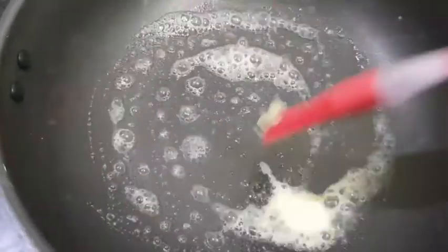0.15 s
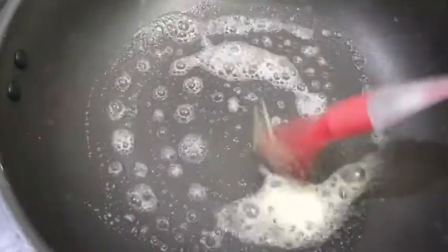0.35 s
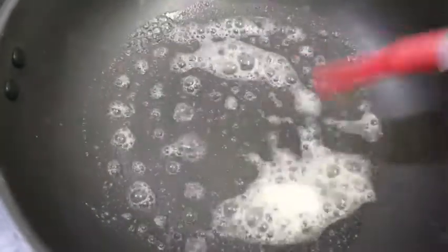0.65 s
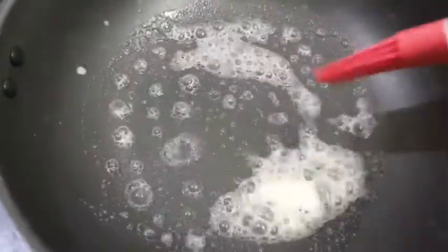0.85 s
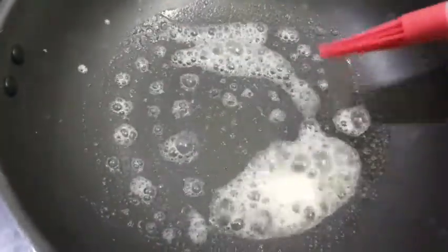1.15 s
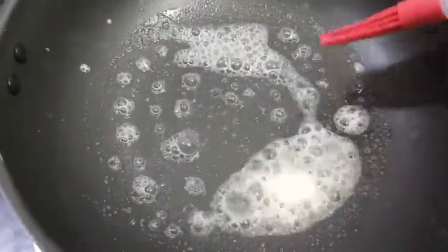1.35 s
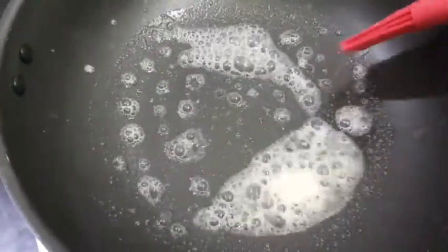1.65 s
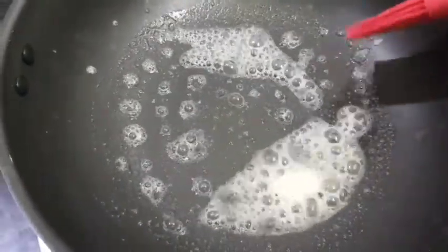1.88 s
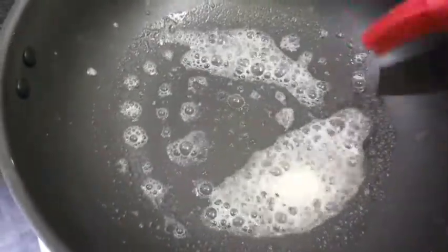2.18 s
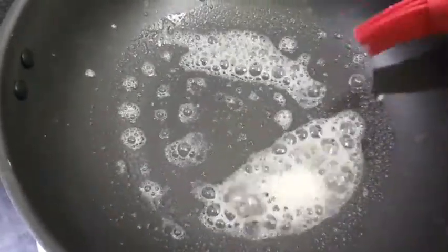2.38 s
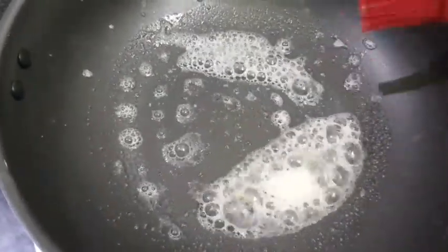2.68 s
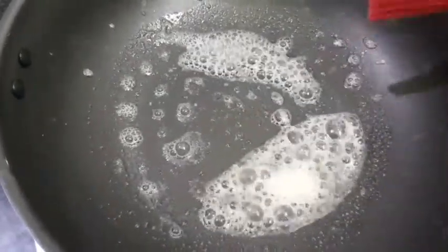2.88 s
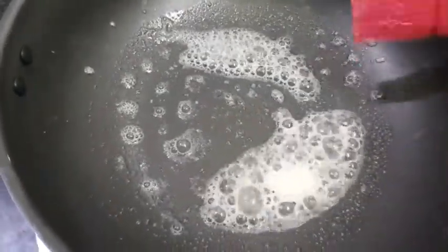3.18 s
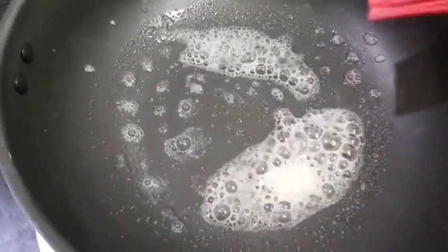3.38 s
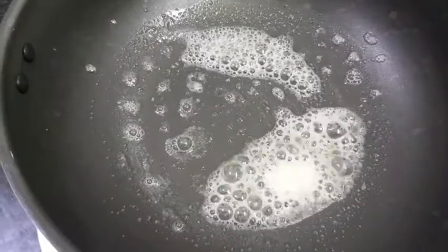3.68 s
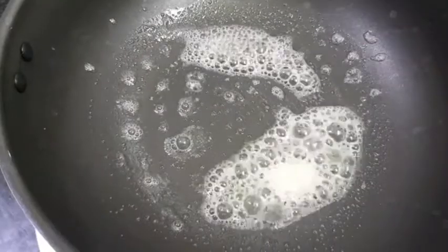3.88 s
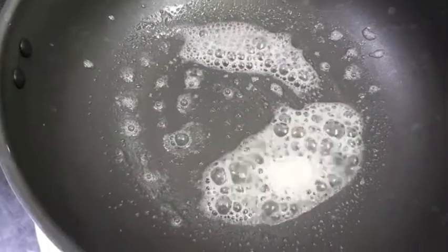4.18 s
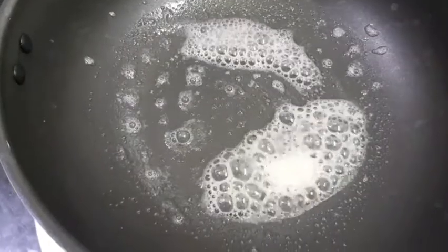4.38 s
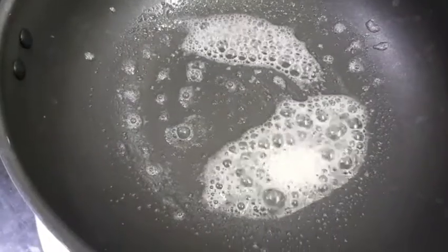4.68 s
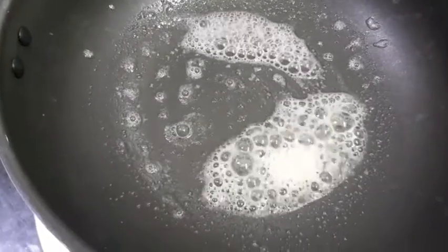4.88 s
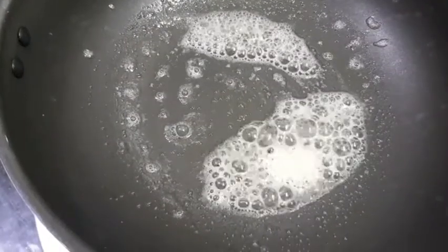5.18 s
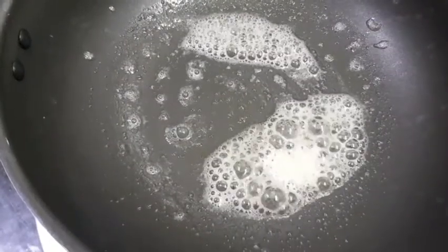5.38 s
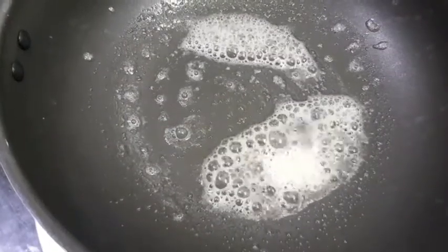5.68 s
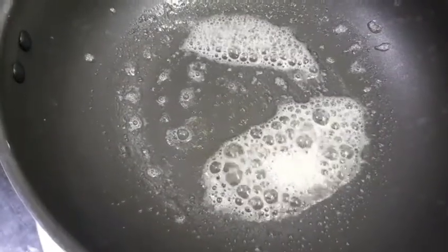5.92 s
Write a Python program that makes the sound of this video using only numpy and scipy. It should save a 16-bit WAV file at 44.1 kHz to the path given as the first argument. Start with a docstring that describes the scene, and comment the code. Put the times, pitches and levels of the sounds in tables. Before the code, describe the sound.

A dense, sharp sizzle of melting butter opens at once, strongest in the first second, then thins out so that individual bubbles snap and tick. Five hard, dry utensil knocks fall midway, each with a quick rebound or soft thud. Afterwards only light crackle, irregular pops and small dull handling bumps remain over a low hum and a slightly growing fan rush. Small kitchen, close stereo microphone, pan toward the left.

```python
"""Butter sizzling in a hot pan

Butter sizzles close by: random vapour clicks make a bright fizz that calms as the water boils off,
and short decaying rings make the foam bubbles that pop.
A utensil is knocked five times on hard kitchenware: noise contacts, decaying modes, a small kitchen's echo.
Hum tones of the stove and the filtered-noise rush of its fan lie underneath, with soft bumps of handling."""
import sys
import numpy as np
from scipy import signal
from scipy.fft import rfft, irfft, next_fast_len
from scipy.io import wavfile
from scipy.ndimage import map_coordinates

SR = 44100
rng = np.random.default_rng(int(sys.argv[2]) if len(sys.argv) > 2 else 0)


def store_wav(level_fs):
    """Save 16-bit WAV to argv[1]."""
    pcm = np.round(np.clip(np.atleast_2d(level_fs), -1, 1) * 32767)
    wavfile.write(sys.argv[1], SR, pcm.T.astype(np.int16))


N = 266805
TIME_S = np.arange(N) / SR
TOP_HZ = 15850  # band limit
PORT_LAG_S = 0.0001  # sound reaches the right microphone port later

# utensil knocks: t/s, level/dB, treble gain from 6 kHz up/dB, rebound delay/s, rebound level re knock/dB
KNOCK_EVENTS = [(1.5657, -8, -1, .015, -9.5), (1.7651, -8.5, 0.5, 0.016, -9),
                (1.9606, -8.5, -6.5, 0.0099, -16), (2.4151, -13.5, -7.5, 0.015, -33),
                (2.79, -8.5, -0.5, 0.031, -34)]


def amp(db):
    """Decibels to gain."""
    return 10 ** (np.asarray(db) / 20)


def unit(x):
    """Scaled to rms 1."""
    return x / np.sqrt(np.mean(x ** 2) + 1e-20)


def along(points, hz):
    """(f/Hz, value) points read on a log frequency axis."""
    f, v = np.transpose(points)
    return np.interp(np.log(hz + 1), np.log(f + 1), v)


def ramp(start_s, end_s):
    """Rises from 0 to 1 between two times."""
    return np.clip((TIME_S - start_s) / (end_s - start_s), 0, 1)


def wobble(rate_hz):
    """Smooth random curve, rate_hz knots a second."""
    knots = rng.standard_normal(int(N * rate_hz / SR) + 4)
    return map_coordinates(knots, [np.arange(N) * rate_hz / SR])


def convolve(x, response):
    """x through a response, cut to its own length."""
    return signal.fftconvolve(np.atleast_2d(x), np.atleast_2d(response), axes=1)[:, :x.shape[-1]]


def colour(x, points, size=8192):
    """Minimum-phase filter with the gain of (f/Hz, gain/dB) points."""
    gain = amp(along(points, np.fft.rfftfreq(size, 1 / SR)))
    # folding the cepstrum makes the response causal
    cepstrum = irfft(np.log(gain))
    cepstrum[1:size // 2] *= 2
    cepstrum[size // 2 + 1:] = 0
    response = irfft(np.exp(rfft(cepstrum)))
    return convolve(x, response).reshape(x.shape)


def add(track, s, sound):
    """Mix a sound into a track from time s."""
    part = track[..., max(0, round(s * SR)):][..., :sound.shape[-1]]
    part += sound[..., :part.shape[-1]]


def stereo_noise(side_db):
    """Two noise channels: a shared mid, plus and minus a side at side_db."""
    mid, side = rng.standard_normal((2, N))
    side = amp(side_db) * side
    return np.array([mid + side, mid - side])


def kitchen(x):
    """The room's answer: a stereo noise tail whose treble dies first."""
    # kitchen reverberation: f/Hz, t60/s
    room_t60 = [(150, 0.87), (1200, 0.27), (3000, 0.22), (7000, 0.23), (15000, 0.2)]
    hz, t, z = signal.stft(rng.standard_normal((2, SR // 2)), SR, nperseg=256)
    decay = amp(-60 * t / along(room_t60, hz)[:, None])
    onset = 1 - np.exp(-t / 0.0023)
    tail = signal.istft(z * decay * onset, SR, nperseg=256)[1]
    return convolve(x, tail / np.linalg.norm(tail[0]))


def in_pan(x, scatter_t60=0.023, scatter_db=-4, far_db=-1):
    """From one spot in the pan: direct mostly to the left port, scattered by the pan wall to both."""
    t = np.arange(SR // 40) / SR
    paths = rng.standard_normal((2, len(t))) * amp(-60 * t / scatter_t60)
    paths *= amp([[scatter_db], [far_db]]) / np.linalg.norm(paths, axis=1, keepdims=True)
    paths[0, 0] += 1
    paths[1, round(PORT_LAG_S * SR)] += 0.12
    return convolve(x, paths)


def burst(hz, cycles, size=96):
    """A bubble's short ring with a softened start, decaying by 1/e in the given cycles."""
    turns = hz * np.arange(size) / SR
    return np.sin(2 * np.pi * turns) * np.exp(-turns / cycles) * (1 - np.exp(-turns ** 2))


def crackle(rate_hz, spread_db, hz, scatter, cycles, count=8):
    """Random bubble bursts of rms 1 overall from count spots; a few are much larger than the rest."""
    out = np.zeros((2, N))
    for _ in range(count):
        when, pitch, size = rng.random((3, int(rate_hz * N / SR / count)))
        pitch_hz = np.clip(hz * (pitch / (1 - pitch)) ** scatter, SR / 40, TOP_HZ)
        size_db = -spread_db * np.log(size + 0.009)
        grains = burst(pitch_hz[:, None], cycles) * amp(size_db)[:, None]
        index = (when * N).astype(int)[:, None] + np.arange(grains.shape[1])
        out += in_pan(np.bincount(index.ravel(), grains.ravel(), N)[:N])
    return unit(out)


def spray(rate_hz, spread_db, spectrum, count=6):
    """Random clicks of either sign, of rms 1 overall, from count spots, coloured by a spectrum."""
    out = np.zeros((2, N))
    for _ in range(count):
        fires = rng.random(N) < rate_hz / count / SR
        size_db = spread_db * np.minimum(rng.standard_normal(N), 2.6)
        out += in_pan(fires * rng.choice([-1, 1], N) * amp(size_db))
    return unit(colour(out, spectrum))


def boiling():
    """How hard the water boils, 0-1: surges as the butter spreads over hot metal, then dies away."""
    spread_from_s, spread_to_s = 0.3, 0.51
    start_share, calm_s = 0.77, 1.61  # boil before spreading; decay time constant
    surge = start_share + (1 - start_share) * ramp(spread_from_s, spread_to_s)
    return surge * np.exp(-np.maximum(TIME_S - spread_to_s, 0) / calm_s)


def butter():
    """Vapour fizz, foam bubbles and frying in shared small spurts; fizz and foam follow the boil."""
    # butter frying on bare metal: t/s, level before a 5 dB lift/dB
    fry_levels = [(0.0, -47.5), (0.34, -49.5), (0.5, -47.5), (1.85, -47), (2.04, -50.5), (3.84, -54.5),
                  (4.77, -52), (6.05, -51.5)]
    # click spectra of fizz, frying and tearing films: f/Hz, gain/dB
    fizz_spectrum = [(700, -38), (2000, -19), (4000, -14.5), (6000, -6.5), (9000, -4), (11500, -2),
                     (13700, 0.5), (15800, -3)]
    fry_spectrum = [(300, -22.5), (800, -5.5), (1500, -5.5), (2800, -1), (3700, -3), (5000, 0),
                    (8000, -17.5), (15000, -39)]
    snap_spectrum = [(800, -26), (2500, -14.5), (4500, -4.5), (7000, -3.5), (10000, 1), (15800, -7.5)]
    # the right port faces away from the pan: f/Hz, gain/dB
    far_port = [(500, -4.5), (2000, 1), (5000, 1), (7000, -5), (8500, -14), (9500, -4.5), (11500, -2.5),
                (15000, 1.5)]
    boil = boiling()
    fizz_db = -43 + 17 * boil
    foam_db = -45.5 + 2.5 * boil
    fry_db = 5.0 + np.interp(TIME_S, *np.transpose(fry_levels))
    spurt = wobble(22)

    fizz = amp(fizz_db + 1.7 * spurt) * spray(rate_hz=5000, spread_db=6.0, spectrum=fizz_spectrum)
    foam = amp(foam_db + 1.5 * spurt) * crackle(rate_hz=1100, spread_db=3.5, hz=6530, scatter=0.083, cycles=2.4)
    # medium bubbles stand out of the foam as single ticks
    ticks = amp(foam_db - 2.5) * crackle(rate_hz=50, spread_db=6.0, hz=7180, scatter=0.026, cycles=2.3)
    fry = amp(fry_db + 0.5 * spurt) * spray(rate_hz=7000, spread_db=6.0, spectrum=fry_spectrum)
    # thin films tear with bright, dry snaps
    snaps = amp(foam_db - 1.5) * spray(rate_hz=70, spread_db=5.5, spectrum=snap_spectrum)
    near = fizz + foam + ticks + snaps + fry + big_pops()
    left, right = near + amp(-15) * kitchen(near)
    return np.array([left, colour(right, far_port)])


def stove():
    """Slightly unsteady hum tones; fan rush and room rumble, both filtered noise, swell together."""
    # stove hum: f/Hz, nominal rms level/dB
    hum_tones = [(59.5, -66.5), (118.4, -66), (300.2, -54)]
    # spectra of the room rumble and the fan rush: f/Hz, gain/dB
    rumble_spectrum = [(15, -38), (30, -11), (55, 3.5), (100, 2), (160, -3.5), (250, -3.5), (500, -50.5)]
    fan_spectrum = [(120, -17.5), (220, -11.5), (270, -2), (370, 2.5), (450, -1.5), (550, -2), (750, -10.5),
                    (1500, -12.5), (4000, -38), (12000, -30)]
    swell = ramp(3.8, 6.3)
    rumble_db = -59.5 + 5.5 * swell + 3.14 * wobble(9)
    fan_db = -53 + 6.5 * swell

    hum = np.zeros(N)
    for hz, db in hum_tones:
        tone = np.sin(2 * np.pi * hz * TIME_S + 0.3 * wobble(9))
        hum += np.sqrt(2) * amp(db + 1.8 * wobble(9)) * tone
    rumble = amp(rumble_db) * unit(colour(stereo_noise(side_db=-11.5), rumble_spectrum))
    fan = amp(fan_db) * unit(colour(stereo_noise(side_db=-6.5), fan_spectrum))
    return hum + (rumble + fan) * amp([[0.8], [-0.8]])


def big_pops():
    """Large bubbles: a short ring on the snap of the tearing film, then the neighbours burst too."""
    # largest bubbles bursting: t/s, level before a 15 dB lift/dB, f/Hz
    pop_events = [(0.3007, -17, 7400), (0.3655, -15, 14100), (0.9188, -17, 12800), (1.922, -19, 11200),
                  (2.7222, -17.5, 14600), (3.0729, -25.5, 6530), (3.1835, -14, 8200), (3.3802, -25, 6500),
                  (3.5079, -16, 7140), (3.8742, -23, 6560), (3.9673, -26, 5900), (4.21, -17, 7340),
                  (4.591, -16.5, 8300), (4.6618, -22.5, 6170), (4.7257, -24.5, 7050), (5.002, -25.5, 7300),
                  (5.1281, -17, 7100), (5.433, -21, 12400), (5.6316, -10.5, 12200), (5.6783, -14.5, 7300),
                  (5.9244, -17, 10100), (5.9914, -17.5, 7540)]
    out = np.zeros((2, N))
    t = np.arange(SR // 30) / SR
    click = 1.0 * (t == 0)
    snap = amp(-5.5) * colour(click, [(300, -12), (1500, -4.5), (5000, -1.5), (15000, -0.5)])
    for s, db, hz in pop_events:
        ring = burst(hz, cycles=1.41, size=len(t))
        fires = rng.random(len(t)) < 1500 / SR
        neighbours = fires * rng.standard_normal(len(t)) * np.exp(-t / 0.0035)
        pop = convolve(ring + snap, click + amp(-8.5) * neighbours)
        add(out, s, in_pan(amp(db + 15) * pop, scatter_t60=0.018, scatter_db=-5, far_db=-5))
    return out


def knocks():
    """Each knock is a chattering contact of a few ms, a short modal ring, a room echo and a rebound."""
    # modes of the kitchenware: f/Hz, level/dB, t60/s
    ware_modes = [(692, -23.5, 0.14), (782, -11, 0.045), (1056, -14.5, 0.067), (1244, -3.5, 0.1),
                  (1276, -3.5, 0.027), (1356, -5, 0.043), (1750, -11, 0.081), (1926, -20, 0.085),
                  (1970, 1.5, 0.023), (2330, -19, 0.029), (2654, 8.5, 0.019), (2740, -17, 0.052),
                  (2780, -7, 0.033), (3187, -1, 0.045), (3260, -7.5, 0.09), (3710, -24, 0.027),
                  (4290, -8, 0.032), (4970, -11.5, 0.039), (6900, -7, 0.028), (7330, -7, 0.024)]
    # crack of the contact: f/Hz, gain/dB
    crack_spectrum = [(100, -22), (500, -21), (750, -11.5), (950, -16), (1280, -1), (1650, -4.5),
                      (2600, -1.5), (3200, -1), (4000, -6.5), (6400, -0.5), (8000, -10), (9700, -8),
                      (11000, -19), (16000, -26)]
    # the right port misses the top of the knocks: f/Hz, gain/dB
    right_shade = [(5500, 0.5), (8000, -4)]
    out = np.zeros((2, N))
    t = np.arange(SR // 2) / SR
    click = 1.0 * (t == 0)
    hz, mode_db, t60 = np.transpose(ware_modes)[:, :, None]
    phase = 2 * np.pi * rng.random(hz.shape)
    for s, db, hard_db, rebound_s, rebound_db in KNOCK_EVENTS:
        # mode levels vary from knock to knock
        strength = amp(mode_db + rng.standard_normal(hz.shape) - 60 * t / t60)
        modes = (strength * np.sin(2 * np.pi * hz * t + phase)).sum(0)
        ring = amp(-10.5) * modes * (1 - np.exp(-t / 0.00063))
        chatter = stereo_noise(side_db=-25)[:, :len(t)] * (t / 0.0012) * np.exp(-t / 0.0014)
        left, right = ring + amp(10.5) * colour(chatter, crack_spectrum)
        direct = np.array([left, amp(-6.5) * np.roll(right, round(PORT_LAG_S * SR))])
        # the room smears the whole crack into a dense tail
        crack = amp(25) * colour(click, crack_spectrum)
        echo = kitchen(ring + crack) * amp([[-6], [-7.5]])
        blow = amp(db + 3.0) * colour(direct + echo, [(2500, 0), (6000, hard_db)])
        add(out, s, blow)
        add(out, s + rebound_s, amp(rebound_db) * blow)
    return np.array([out[0], colour(out[1], right_shade)])


def bumps():
    """Band noise under bell-shaped envelopes: a dull thud after each knock, bumps and rubs of handling."""
    # handling: centre t/s, level/dB, f/Hz, half width/frequency ratio, envelope standard deviation/s
    handling = [(1.92, -53, 290, 1.64, 0.14), (2.65, -50.5, 427, 1.09, .055), (2.893, -42, 105, 1.14, .043),
                (4.145, -45.5, 105, 1.37, .022), (4.395, -46.5, 560, 1.85, 0.026),
                (5.33, -52, 80, 1.45, .075), (5.83, -51.5, 109, 1.2, 0.024)]
    thud_delay_s, thud_db = 0.047, -38.5  # after and relative to the knock
    thud_hz, thud_width, thud_length_s = 214, 1.71, 0.041
    thuds = [(s + thud_delay_s, db + thud_db, thud_hz, thud_width, thud_length_s)
             for s, db, *_ in KNOCK_EVENTS]
    out = np.zeros((2, N))
    for s, db, hz, width, length_s in thuds + list(handling):
        band_hz = hz * width ** np.array([-4.0, -1, 0, 1, 4])
        band = np.transpose([band_hz, [-49, -2, 0.5, -0.5, -45]])
        body = unit(colour(stereo_noise(side_db=-15), band))
        out += amp(db) * body * np.exp(-0.5 * ((TIME_S - s) / length_s) ** 2)
    return out


def scene():
    """The pan in front, the rest of the kitchen around it."""
    return butter() + stove() + knocks() + bumps()


def record(dry):
    """Removes everything above the band limit."""
    m = next_fast_len(N + SR // 2)
    keep = np.fft.rfftfreq(m, 1 / SR) < TOP_HZ
    return irfft(rfft(dry, m) * keep, m)[:, :N]


dry = scene()
out = record(dry)
store_wav(out)
```